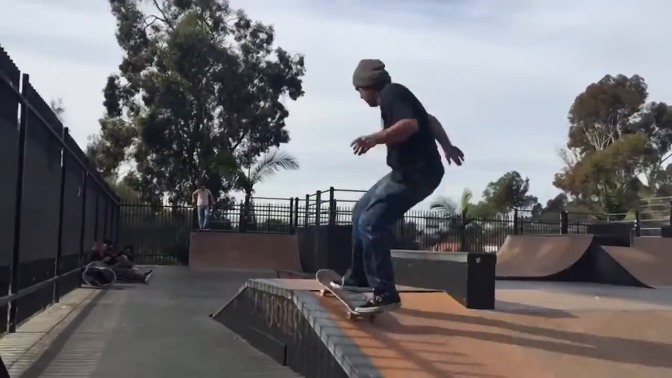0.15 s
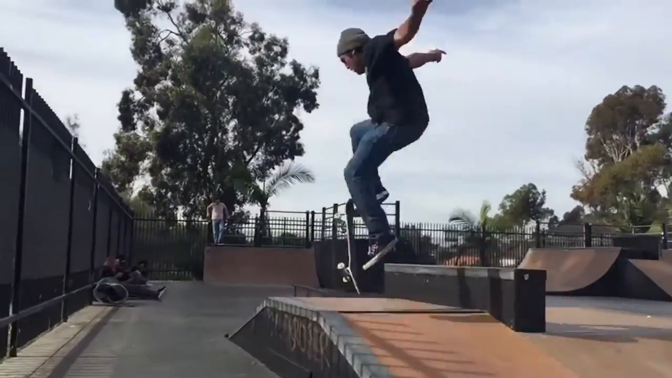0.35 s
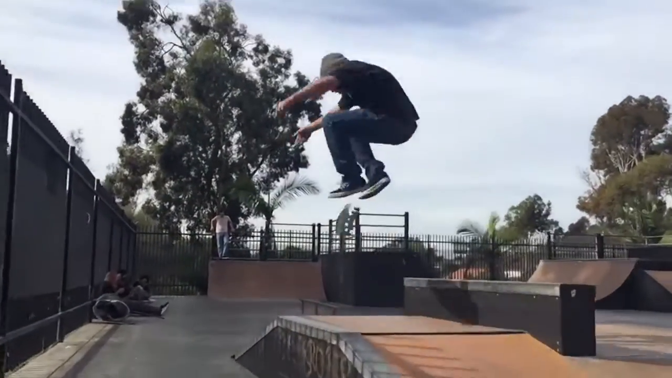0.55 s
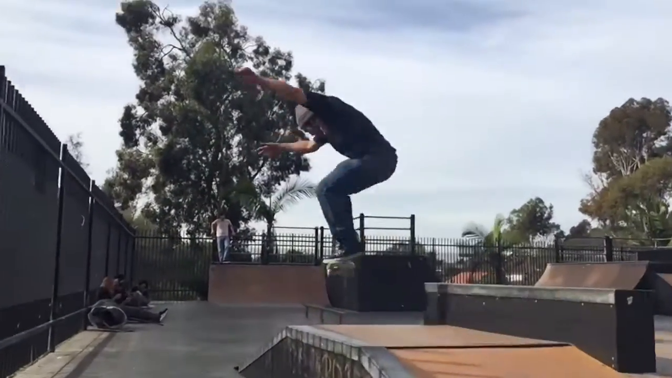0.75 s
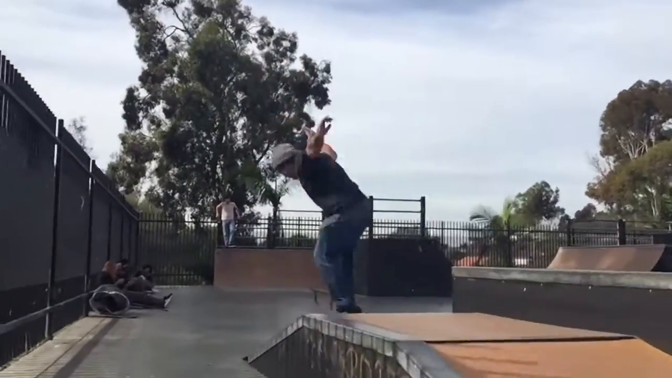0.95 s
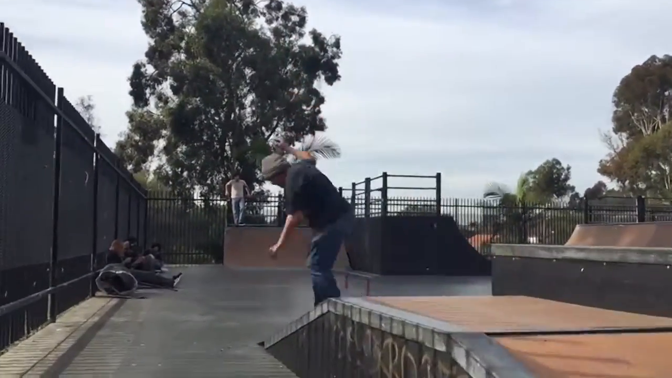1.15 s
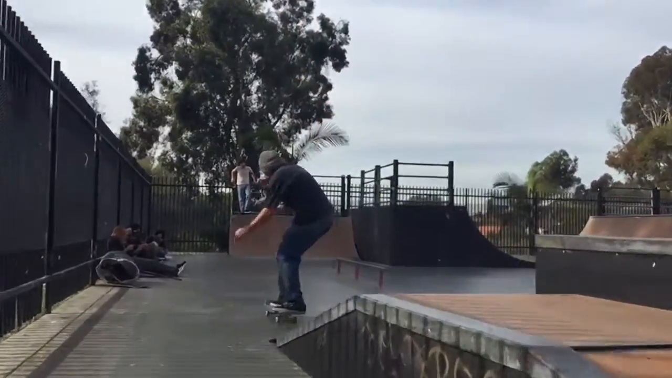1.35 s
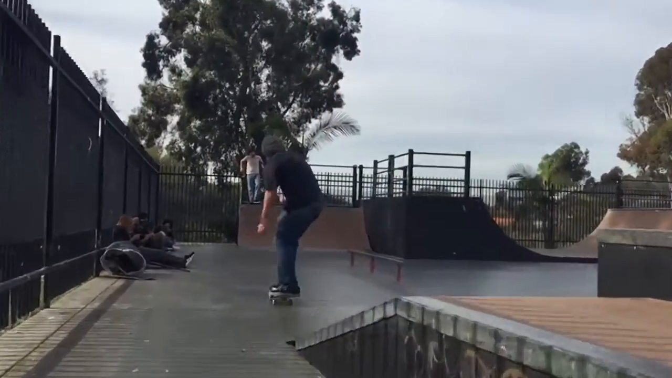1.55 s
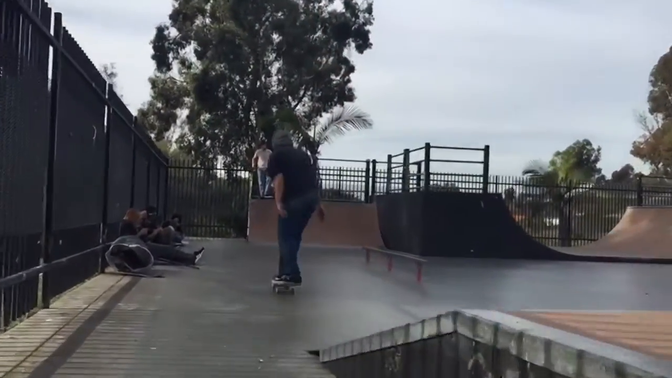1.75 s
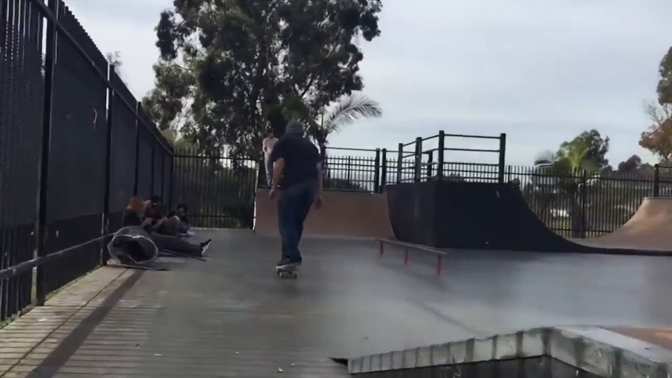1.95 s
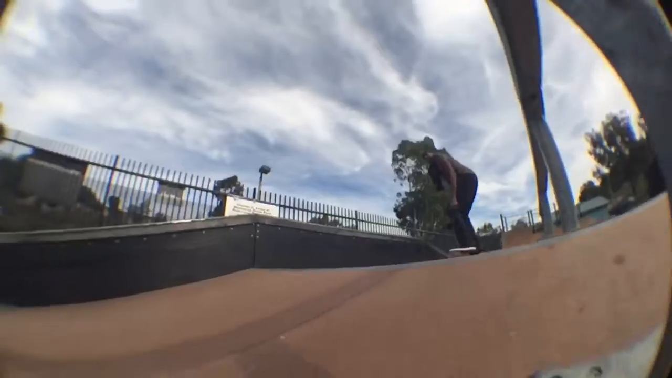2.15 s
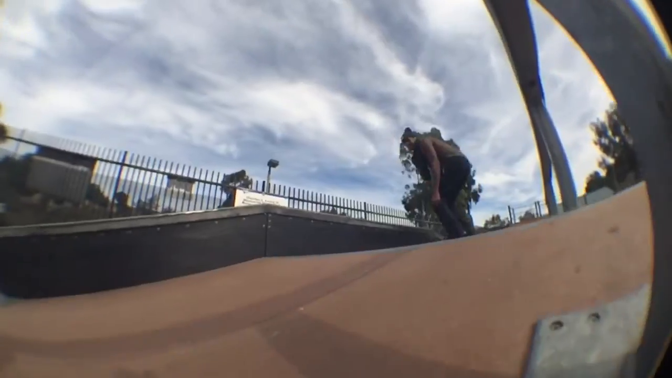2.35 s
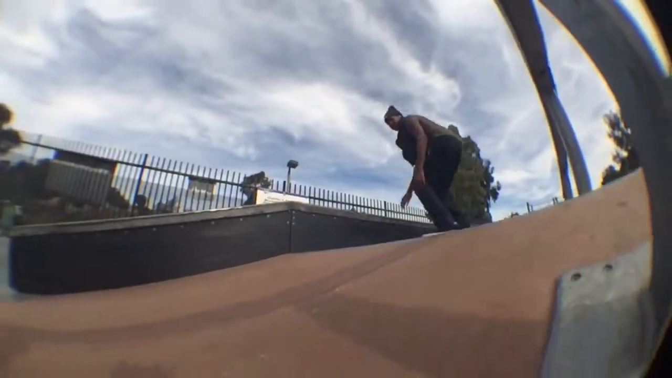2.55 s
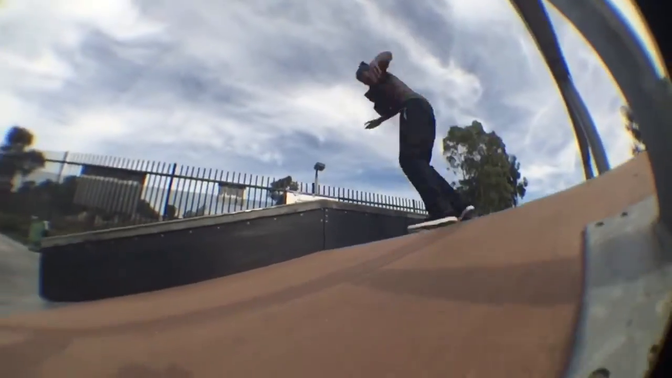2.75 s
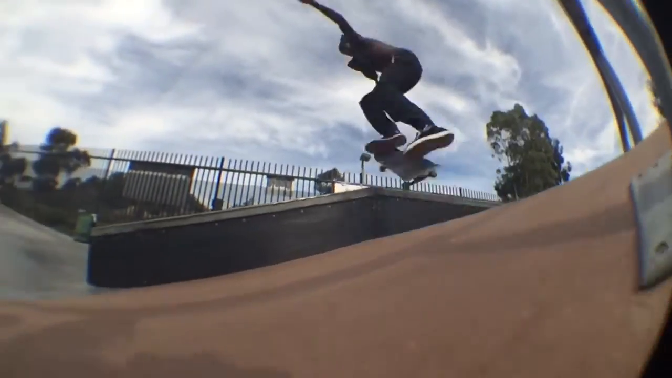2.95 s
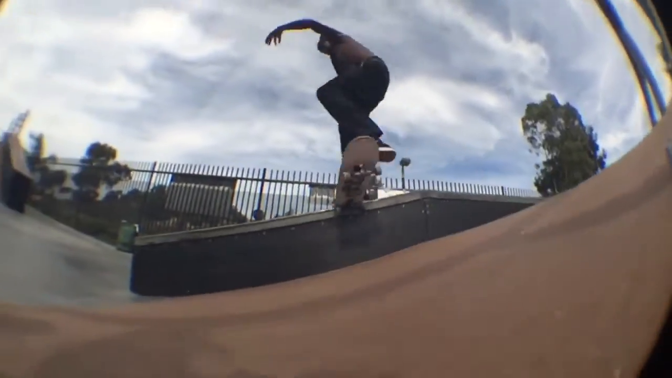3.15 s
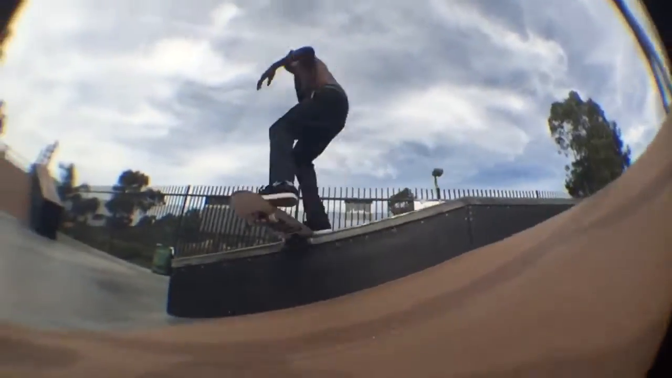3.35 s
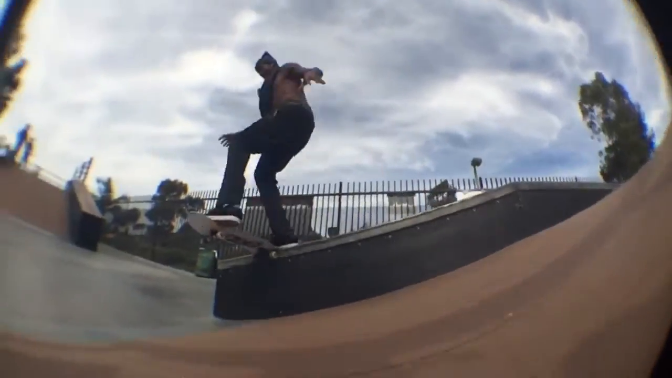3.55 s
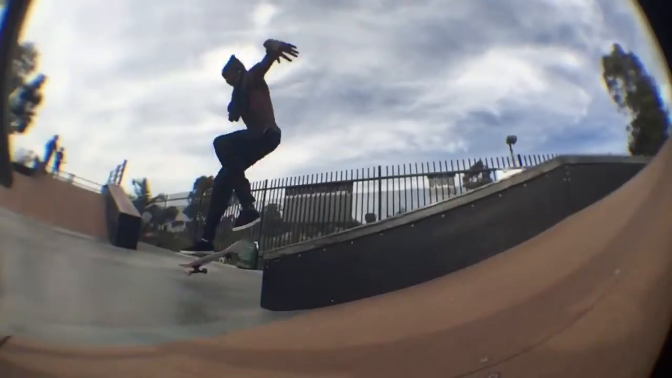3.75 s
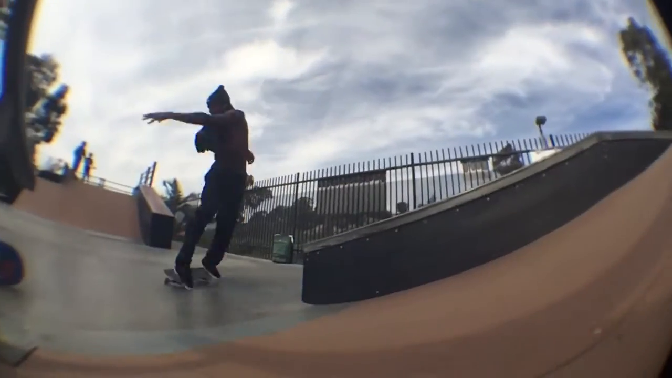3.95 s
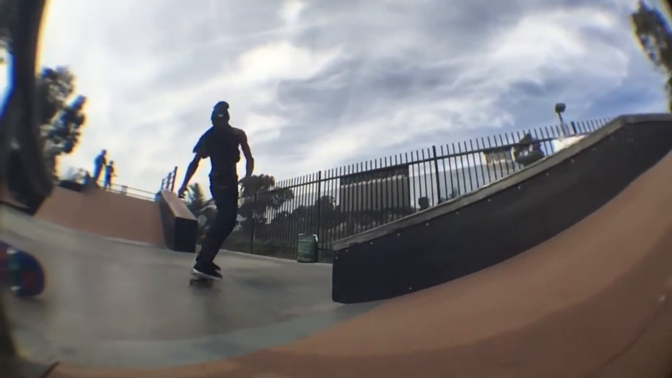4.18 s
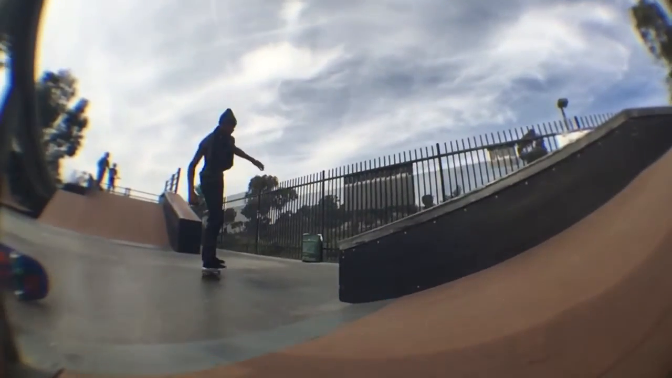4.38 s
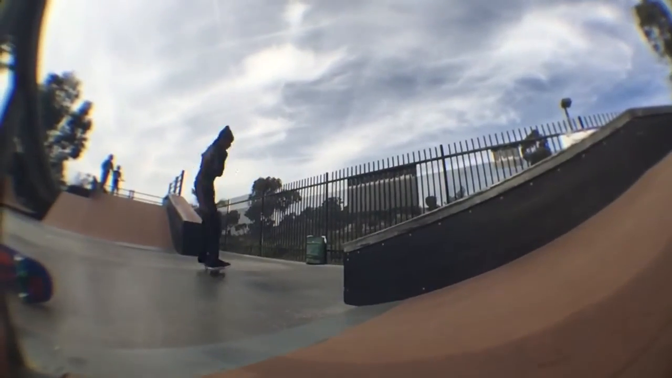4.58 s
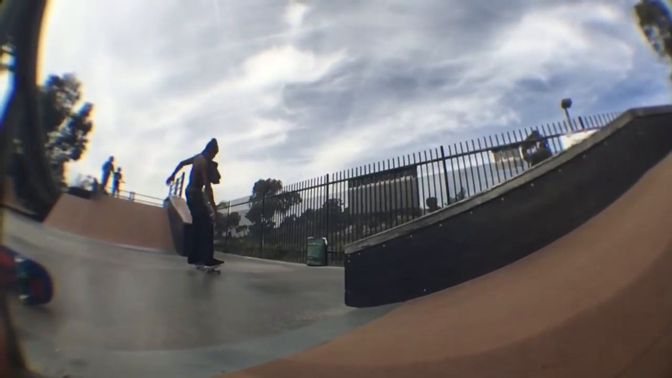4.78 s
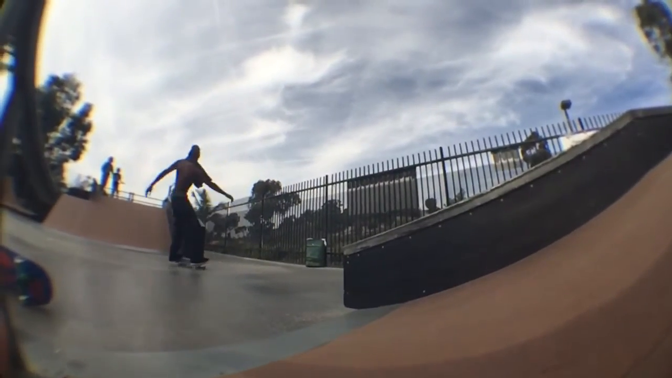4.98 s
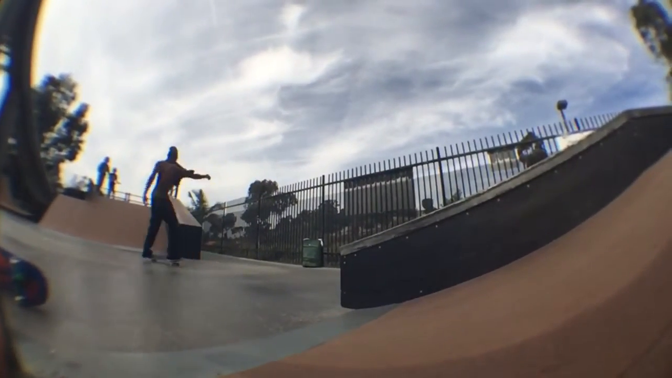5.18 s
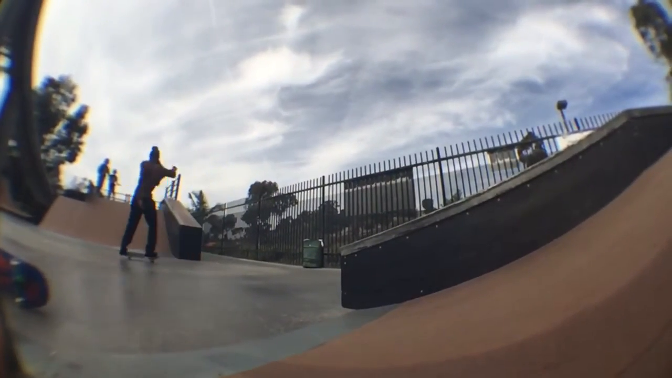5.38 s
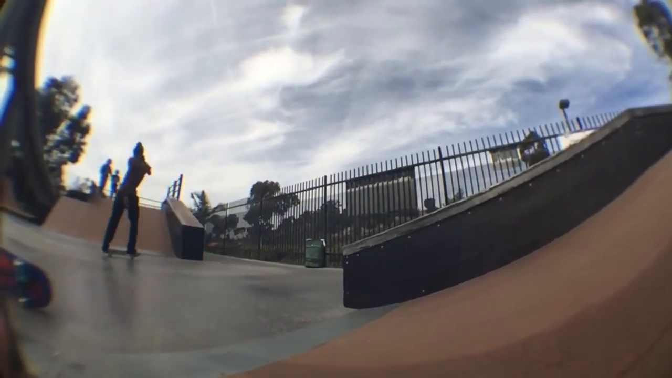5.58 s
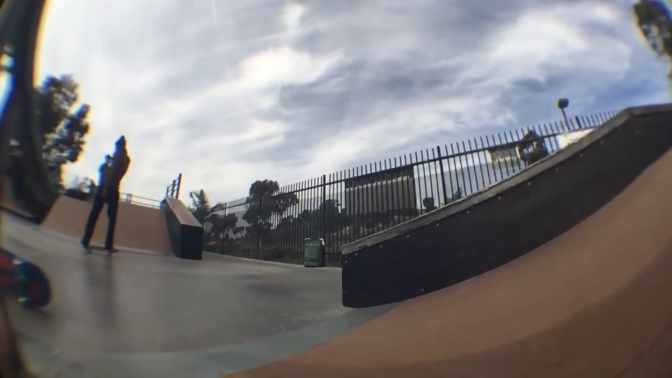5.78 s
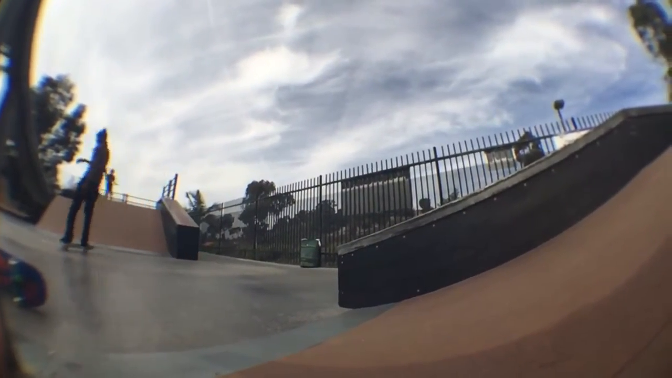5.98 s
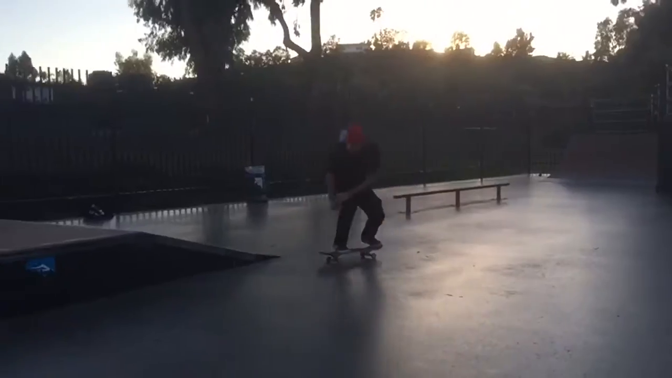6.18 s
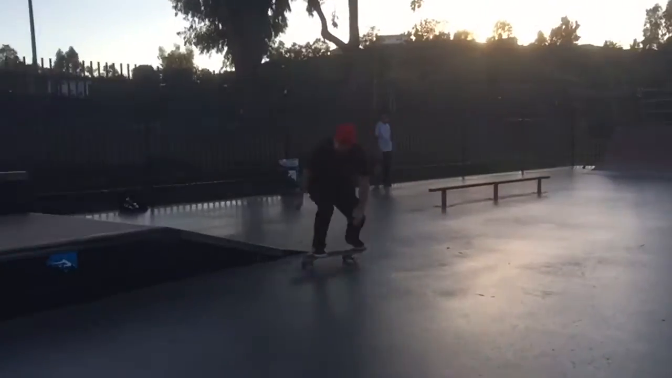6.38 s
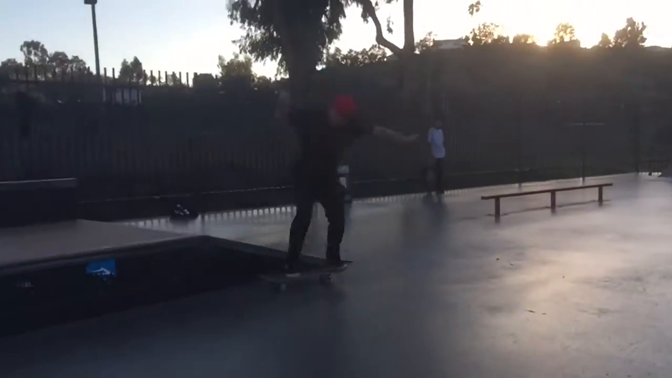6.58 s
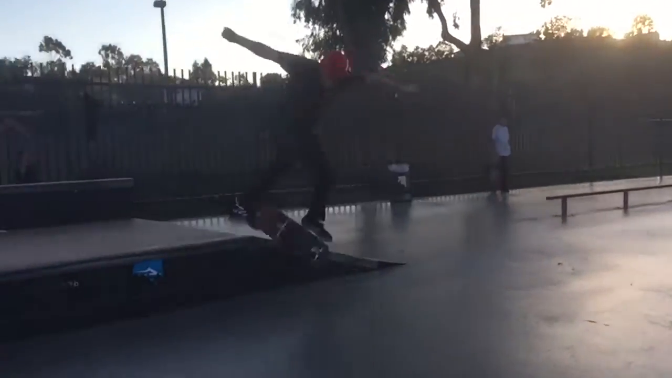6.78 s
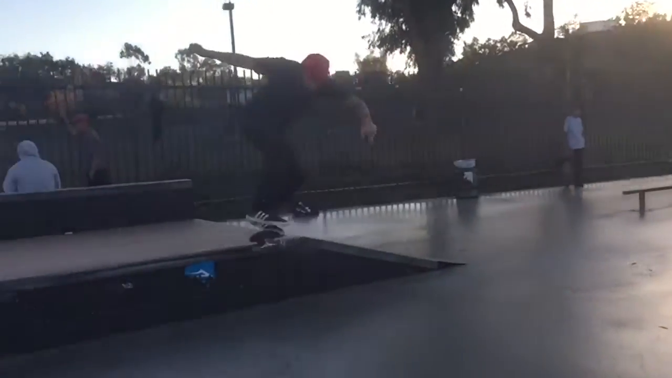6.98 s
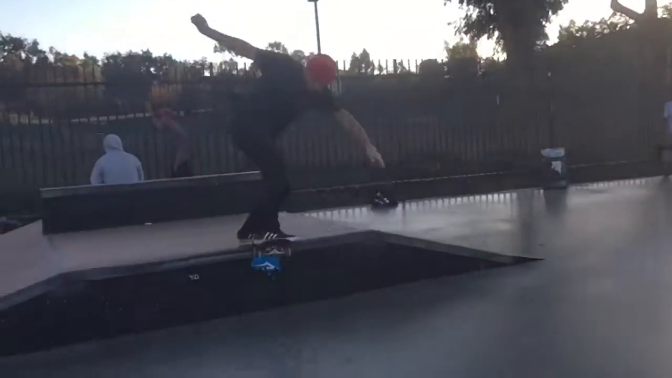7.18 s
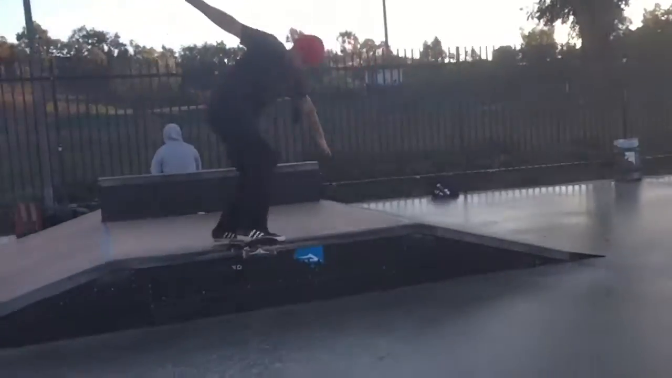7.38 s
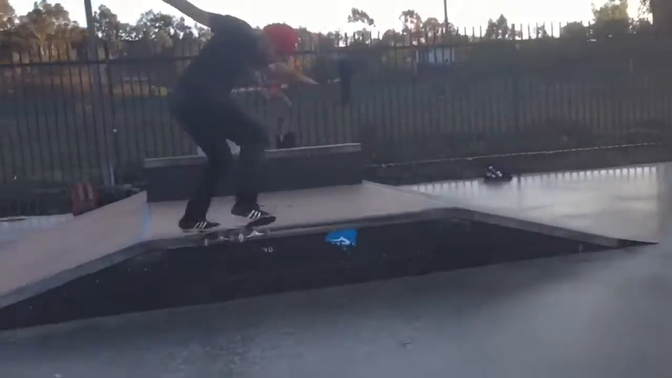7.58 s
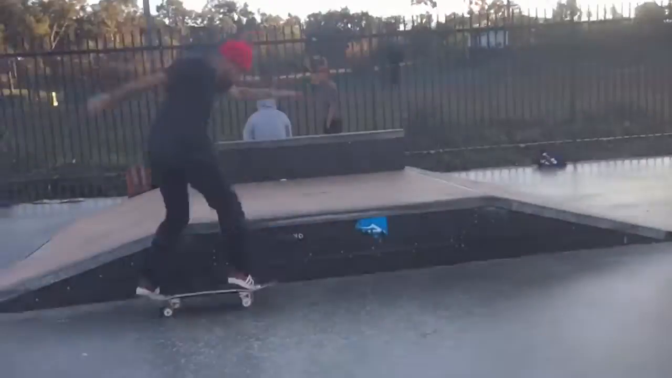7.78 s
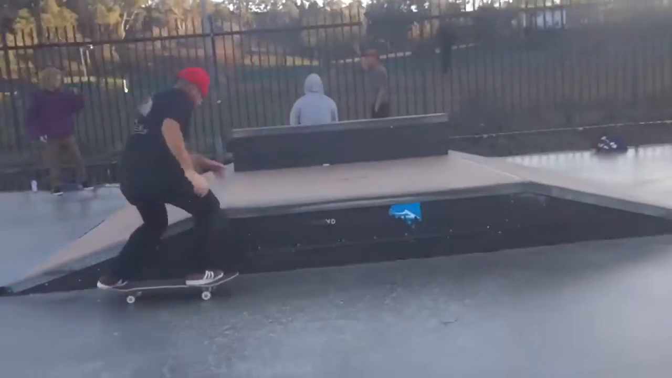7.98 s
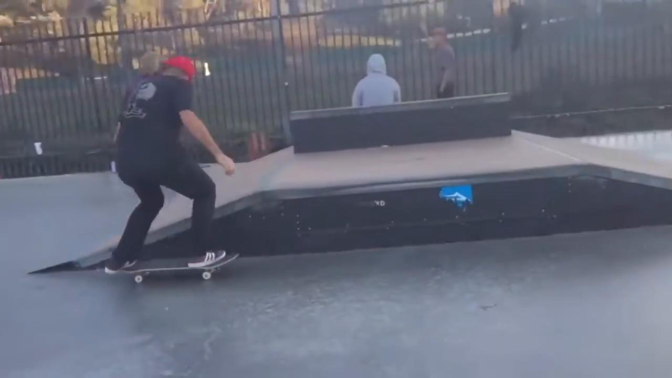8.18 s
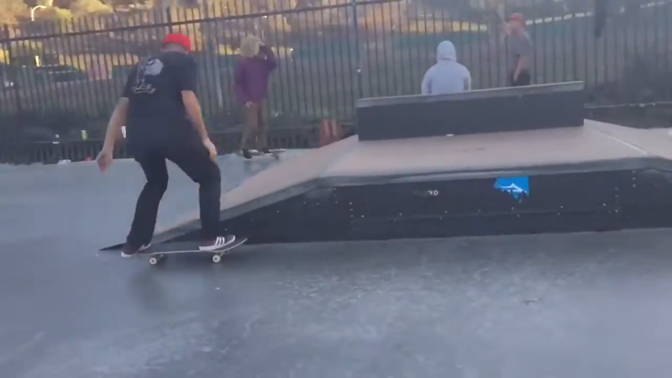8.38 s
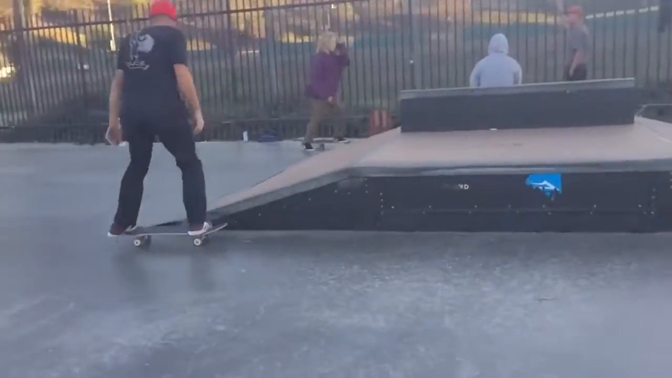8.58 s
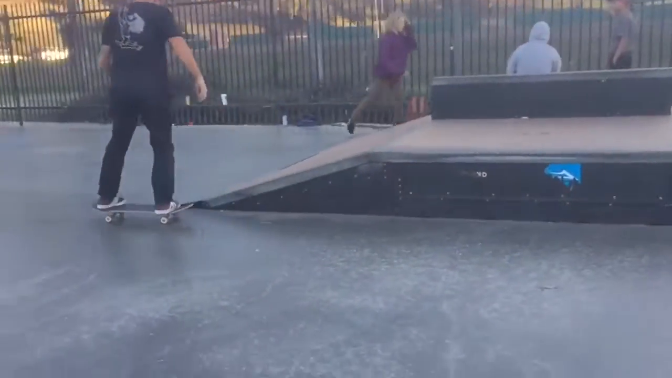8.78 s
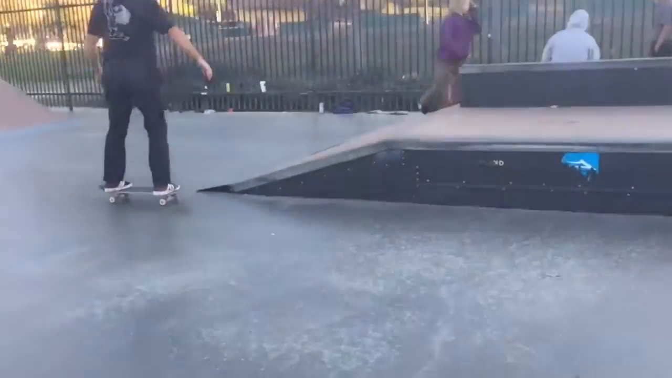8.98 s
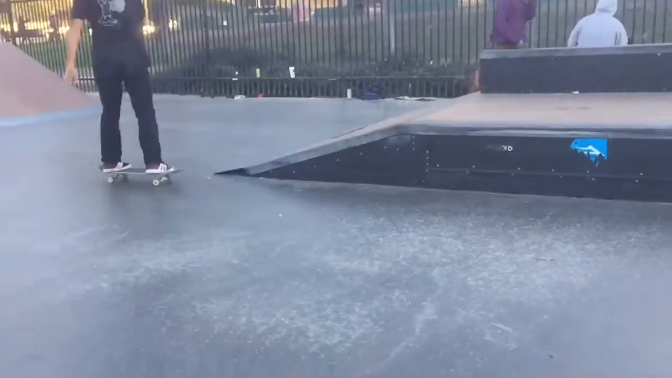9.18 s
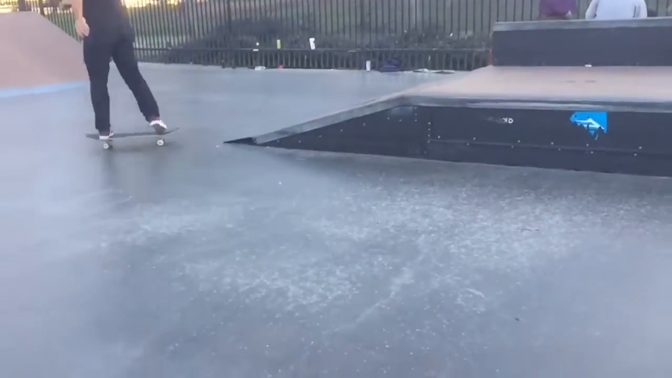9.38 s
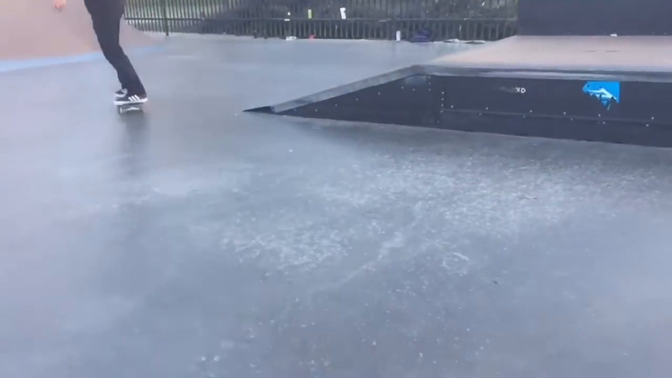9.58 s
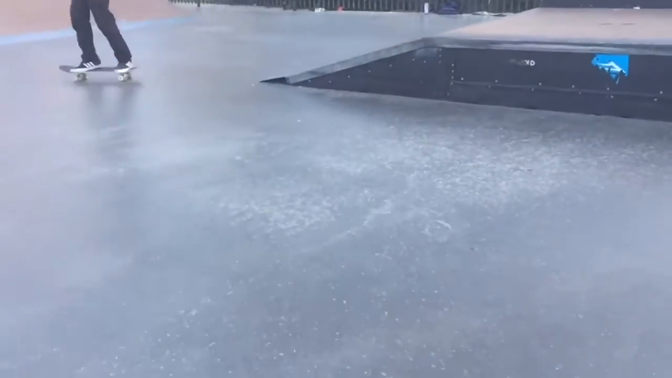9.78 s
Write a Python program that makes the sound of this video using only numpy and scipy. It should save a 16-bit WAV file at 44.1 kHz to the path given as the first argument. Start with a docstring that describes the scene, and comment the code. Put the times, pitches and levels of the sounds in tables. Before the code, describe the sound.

In an open skatepark, a close skateboard rumbles loudly, pops and slams down with scuffs and thuds. A second run rumbles up a bank, cracks hard onto a ledge, grinds briefly and lands sharply, then rolls away faintly. A third, quieter run has a light pop, duller landings and sparse wheel ticks. Thin echoes return from ramps; the close microphone flattens the loudest hits.

```python
"""An outdoor concrete park: three skateboard runs, one after the other, heard from a board that rolls alongside.
Rolling and sliding are filtered noise with grains of grit, shaped by level curves, with narrow resonances humming.
Pops, landings and joints are short broadband blows that ring a deck; heavy ones add low damped swings of the deck.
The blows echo off ramps and walls, and the loudest peaks overload the microphone."""
import sys
import numpy as np
from scipy import signal
from scipy.io import wavfile

SR = 44100
rng = np.random.default_rng(int(sys.argv[2]) if len(sys.argv) > 2 else 0)


def store_pcm(level_fs):
    """Save levels as 16-bit WAV."""
    pcm = np.round(np.clip(level_fs, -1, 1) * 32767).astype(np.int16)
    wavfile.write(sys.argv[1], SR, np.atleast_2d(pcm).T)


N = 433944
TIME = np.arange(N) / SR  # [s]
EDGE_HZ = 15600  # upper limit of the band, and start of the sweep in each blow
RUN_FADE_S = 0.037  # the rolling dips between two runs

# Moments when the second and the third rider take over: (time [s])
RUN_STARTS = [2.05, 6.08]


def gain_of(db):
    """Level definition: decibels to amplitude, 20 dB per factor of ten."""
    return 10 ** (np.asarray(db) / 20)


def evened(x):
    """Power normalisation: scales a signal to rms 1."""
    return x / np.sqrt(np.mean(x ** 2) + 1e-20)


def read(points, hz):
    """Logarithmic frequency scale: interpolates a table along it."""
    f, value = np.transpose(points)
    return np.interp(np.log(hz + 1), np.log(f + 1), value)


def add(mix, s, sound):
    """Superposition: sums a sound into the mix from time s on."""
    part = mix[max(round(s * SR), 0):][:len(sound)]
    part += sound[:len(part)]


def coloured(x, points, size=4096):
    """Minimum-phase filtering: the phase is the Hilbert transform of the log gain, so the filter is causal."""
    hz = abs(np.fft.fftfreq(size, 1 / SR))
    log_gain = np.log(gain_of(np.maximum(read(points, hz), -100)))
    response = np.exp(np.conj(signal.hilbert(log_gain)))
    taps = np.fft.ifft(response).real
    return signal.fftconvolve(x, taps[:size // 2])[:len(x)]


def wander(hz):
    """Low-passed noise: a slow random fluctuation of rms 1, up to the given rate."""
    low_pass = 1 / (1 + (np.fft.fftfreq(N, 1 / SR) / hz) ** 4)
    slow = np.fft.ifft(np.fft.fft(rng.standard_normal(N)) * low_pass).real
    return evened(slow)


def during(start, end, fade_s):
    """Linear gating: gain of 1 from start to end, with soft edges inside."""
    return np.clip(np.minimum(TIME - start, end - TIME) / fade_s, 0, 1)


def curve(points):
    """Level envelope: gain along a curve in decibels that fades in and out at its ends."""
    s, db = np.transpose(points)
    return gain_of(np.interp(TIME, s, db)) * during(s[0], s[-1], RUN_FADE_S)


def swells(events, rise_db_per_s, fall_db_per_s):
    """Exponential growth and decay: a contact builds up to each peak and then lets go."""
    gains = []
    for s, db in events:
        below_peak = np.maximum((s - TIME) * rise_db_per_s, (TIME - s) * fall_db_per_s)
        gains.append(gain_of(db - below_peak))
    return np.max(gains, axis=0)


def rubbing(colour, level, grit_per_s, grit_db, lumpy_db, lumpy_hz):
    """Roughness excitation: fine texture and separate grains shake a board under a wavering contact force."""
    texture = rng.standard_normal(N)
    grit = rng.standard_normal(N) * (rng.random(N) < grit_per_s / SR)
    force = gain_of(lumpy_db * wander(lumpy_hz))
    drive = (texture + gain_of(grit_db) * evened(grit)) * force
    return evened(coloured(drive, colour)) * level


def wheels():
    """Rolling noise: the roughness of concrete under urethane wheels, coloured run by run."""
    # Spectra of the rolling, the second run in two layers: (frequency [Hz], relative level [dB])
    first_colour = [(18, -57), (30, -14), (75, 3.5), (160, -3), (262, -0.5), (466, -2), (943, -12),
                    (1070, -7.5), (1510, -19), (2060, -21), (2290, -15), (2900, -29.5), (7620, -39),
                    (11900, -39), (15400, -45)]
    ramp_colour = [(20, -38), (45, -14), (100, -4), (170, -3.5), (290, -9.5), (390, -11), (520, -15.5),
                   (800, -16), (1100, -22), (2000, -27), (3000, -41), (4500, -49.5), (5300, -59.5),
                   (15000, -75.5)]
    away_colour = [(25, -39), (65, -5), (110, -8.5), (170, -3.5), (270, -8), (400, -6), (720, -4),
                   (950, -3.5), (1800, -5), (2300, -14.5), (3000, -26), (6200, -40.5), (10500, -52.5),
                   (14000, -45.5)]
    last_colour = [(20, -2), (35, 2.5), (66, -2), (105, -17), (170, -7.5), (400, -6), (600, 0), (750, -1),
                   (930, -14), (1250, -15), (2000, -31), (4200, -49), (6500, -53.5), (15000, -55.5)]
    # Loudness of the second run's two layers: (time [s], level [dB])
    ramp_level = [(2.045, -28.5), (2.31, -30), (2.38, -26), (2.85, -26.5), (3.05, -40), (3.5, -42),
                  (3.85, -34), (4.08, -53)]
    away_level = [(2.91, -27), (3.1, -38.5), (4.05, -39.5), (4.15, -48), (4.28, -38), (4.75, -38.5),
                  (5.0, -35), (5.4, -36.5), (5.6, -41.5), (6.08, -42.5)]
    # the first and the last run roll at a steady level
    first_db, last_db = -26, -38
    first_gain = gain_of(first_db) * during(-np.inf, RUN_STARTS[0], RUN_FADE_S)
    last_gain = gain_of(last_db) * during(RUN_STARTS[1], np.inf, RUN_FADE_S)
    first = rubbing(first_colour, first_gain, grit_per_s=490, grit_db=-9.5, lumpy_db=0.54, lumpy_hz=25)
    ramp = rubbing(ramp_colour, curve(ramp_level), grit_per_s=590, grit_db=-7.5, lumpy_db=0.1, lumpy_hz=25)
    away = rubbing(away_colour, curve(away_level), grit_per_s=610, grit_db=-8.5, lumpy_db=1.93, lumpy_hz=22)
    last = rubbing(last_colour, last_gain, grit_per_s=400, grit_db=-14.5, lumpy_db=1.76, lumpy_hz=28)
    return first + ramp + away + last


def slides():
    """Sliding friction: wheels scuff, hiss and skid on the banks; a metal truck grinds over the ledge."""
    # Spectra of the four contacts: (frequency [Hz], relative level [dB])
    scuff_colour = [(300, -27.5), (1300, -15.5), (2300, -2.5), (3100, -2), (4000, -3.5), (5000, -14.5),
                    (7000, -21.5), (9500, -23), (15000, -42.5)]
    hiss_colour = [(400, -26.5), (1200, -4), (2400, 1), (3400, -5.5), (4400, -17.5), (5500, -32.5),
                   (9000, -47.5), (15000, -46.5)]
    skid_colour = [(700, -17), (1500, -8), (2600, 2.5), (3300, 3.5), (4300, 0.5), (5100, -14), (6100, -8),
                   (7300, -23), (13000, -25), (15500, -26)]
    grind_colour = [(100, -10.5), (500, -9), (800, -1), (1080, -2), (1600, -13.5), (2200, -14), (3200, -30),
                    (4500, -44), (5600, -40.5), (8000, -56), (15000, -60)]
    # Wheels scuffing sideways at take-offs and landings: (time [s], peak level [dB])
    scuff_peaks = [(0, -11.5), (.056, -13), (.4, -34.5), (1.255, -28.5)]
    # Wheels hissing over a bank: (time [s], peak level [dB])
    hiss_peaks = [(2.75, -32), (3.88, -44), (6.88, -59)]
    # Short skids: (time [s], peak level [dB])
    skid_peaks = [(3.14, -50), (3.46, -50), (3.615, -47), (4.29, -57.5)]
    # The truck biting into the ledge: (time [s], peak level [dB])
    bite_peaks = [(3.225, -19), (3.315, -17.5), (3.405, -19)]
    scuff_gain = swells(scuff_peaks, rise_db_per_s=346.5, fall_db_per_s=174)
    hiss_gain = swells(hiss_peaks, rise_db_per_s=58.5, fall_db_per_s=37)
    skid_gain = swells(skid_peaks, rise_db_per_s=119, fall_db_per_s=113)
    grind_gain = swells(bite_peaks, rise_db_per_s=279.5, fall_db_per_s=224.5)
    # the truck leaves the ledge
    grind_gain = grind_gain * during(-np.inf, 3.445, fade_s=0.022)
    scuff = rubbing(scuff_colour, scuff_gain, grit_per_s=700, grit_db=-6, lumpy_db=0.9, lumpy_hz=90)
    hiss = rubbing(hiss_colour, hiss_gain, grit_per_s=730, grit_db=-2.5, lumpy_db=1.9, lumpy_hz=45)
    skid = rubbing(skid_colour, skid_gain, grit_per_s=149.6, grit_db=-10, lumpy_db=2.0, lumpy_hz=184)
    grind = rubbing(grind_colour, grind_gain, grit_per_s=430, grit_db=-2, lumpy_db=2.5, lumpy_hz=70)
    return scuff + hiss + skid + grind


def drones():
    """Resonance under random excitation: rough ground keeps narrow bands humming as their pitch glides down."""
    # Narrow resonances of the rolling boards:
    # (start [s], end [s], starting frequency [Hz], bandwidth [Hz], level [dB])
    resonances = [(0, 1.1, 84, 35, -63), (0, 1.6, 2300, 400, -70), (0, 1.8, 1223, 120, -60),
                  (2.331, 2.75, 133.4, 14, -33), (3.52, 3.9, 107.8, 46, -34.5),
                  (4.36, 4.62, 1750, 350, -42.5), (4.65, 5.7, 743, 160, -47), (4.9, 6.04, 176.3, 54, -47.5),
                  (6.1, 10, 672.5, 147, -51), (6.1, 9.2, 67, 16.7, -54), (7.3, 7.52, 318.7, 26, -44)]
    pitch_loss = .04  # share of its frequency that a resonance loses as the board slows
    out = np.zeros(N)
    for start, end, hz, width, db in resonances:
        n = int((end - start) * SR)
        shake = rng.standard_normal(n) + 1j * rng.standard_normal(n)
        # slow complex noise on a gliding carrier makes a narrow band
        sway = signal.sosfilt(signal.butter(2, width / 2, fs=SR, output="sos"), shake)
        glide = np.linspace(hz, hz * (1 - pitch_loss), n)
        carrier = np.exp(2j * np.pi * np.cumsum(glide) / SR)
        hum = evened((sway * carrier).real)
        add(out, start, gain_of(db) * hum * signal.windows.tukey(n, .04))
    return out


def clack(deck, db, hz, t60, body_db, edge_db, ring_db=-2, knock_db=-6, knock_t60=0.042, blow=2.8,
          spread_s=.0035, rise_s=.0018, clatter_per_s=400, clatter=5.3, deep_db=-5, shoulder_db=-4, top_db=-14):
    """Impact excitation of modes: a blow and a dying chatter of small contacts ring the deck."""
    t = np.arange(SR // 4) / SR
    rise = 1 - np.exp(-t / rise_s)
    # loose trucks and skipping wheels add separate taps to the chatter
    taps = rng.random(len(t)) < clatter_per_s / SR
    chatter = rng.standard_normal(len(t)) * (1 + clatter * taps)
    chatter = chatter * gain_of(-60 * t / t60) * rise
    # bending waves spread the blow: the treble arrives first, the bass a few ms later
    count = int(spread_s * SR)
    sweep = signal.chirp(t[:count], EDGE_HZ, spread_s, 0, phi=90)
    chatter[:count] += blow * sweep / np.linalg.norm(sweep)
    # where the deck is struck sets the colour around the pitch of the clack
    colour = [(hz / 16, body_db + 2 * deep_db), (hz / 4, body_db + deep_db / 2),
              (hz / 2, body_db), (hz, 0), (hz * np.sqrt(2), shoulder_db), (hz * 4, edge_db),
              (hz * 8, edge_db + top_db), (hz * 24, edge_db + 1.6 * top_db)]
    crack = coloured(chatter, colour)
    modes = sum(gain_of(level - 60 * t / ring) * np.cos(2 * np.pi * f * t) for f, level, ring in deck)
    ringing = signal.fftconvolve(crack, modes)[:len(t)]
    # the resonance struck most squarely gives the clack its pitch
    knock = rise * gain_of(-60 * t / knock_t60) * np.sin(2 * np.pi * hz * t)
    sound = evened(crack) + gain_of(ring_db) * evened(ringing) + gain_of(knock_db) * evened(knock)
    # the level is the whole energy spread over 10 ms
    return gain_of(db) * sound / np.sqrt(np.sum(sound ** 2) / (SR / 100))


def thump(db, hz, t60, rise_s=0.0047):
    """Damped oscillation: one low, decaying swing of the loaded deck."""
    t = np.arange(SR // 2) / SR
    envelope = gain_of(db - 60 * t / t60) * (1 - np.exp(-t / rise_s))
    return envelope * np.sin(2 * np.pi * hz * t)


def deck_at(s):
    """Modal description: the resonances of the deck with its trucks that is ridden at time s."""
    # Modes of each rider's deck: (frequency [Hz], level [dB], t60 [s])
    first_deck = [(313, 2.5, 0.06), (600, -3, 0.017), (720, -8.5, 0.074), (1006, 0, 0.016),
                  (1154, -7.5, 0.032), (1520, -12, 0.062), (2044, -3.5, 0.033), (2340, 6, 0.015),
                  (2490, -4.5, 0.022), (3250, -0.5, 0.025), (3810, 3.5, 0.027), (4600, -14.5, 0.024),
                  (5720, -14, .03)]
    second_deck = [(386, -4.5, 0.051), (548.4, -8, 0.023), (905, -5, 0.038), (1082, 4.5, 0.01),
                   (1400, 2.5, 0.01), (1595, 5.5, 0.014), (1910, -2.5, .04), (2100, -1.5, 0.045),
                   (2328, 4, 0.034), (3160, -4, 0.047), (3720, -2.5, .04), (3965, -4, 0.036),
                   (5745, -2, .03)]
    third_deck = [(311, -1, 0.068), (634, 5, 0.039), (710, -1, 0.033), (730, -4, 0.063), (1016, 0, 0.023),
                  (1216, 5.5, 0.039), (2050, 15.5, 0.01), (2190, 8, 0.021), (2440, 1, .03),
                  (3786, 1, 0.031), (4542, 1.5, 0.036), (5140, -17, .03)]
    return [first_deck, second_deck, third_deck][np.searchsorted(RUN_STARTS, s)]


def boards():
    """Impact and rebound: blows clack and bounce once; a heavy one also flexes the deck; joints only tick."""
    # Tail pops, catches and knocks of the bare board: (time [s], level [dB], clack pitch [Hz], chatter t60 [s],
    # body an octave below the pitch [dB], edge two octaves above it [dB])
    light_blows = [(0.381, -13.5, 2270, 0.024, -11, -22.5), (.729, -16.5, 1553, 0.033, -2, -24),
                   (1.240, -20.5, 3030, 0.1, 3, -16), (3.132, -23.5, 1250, 0.18, -4, -27),
                   (3.176, 1, 1397, 0.012, -1, -24.5), (3.208, -8.5, 1320, 0.051, 1.5, -40.5),
                   (3.301, -16.5, 1000, 0.074, -9.5, -56), (3.318, -13, 1055, 0.068, -16, -56),
                   (3.668, -9.5, 790, 0.027, -12.5, -31.5), (3.685, -12, 805, 0.12, -11, -26),
                   (3.939, -1, 1866, 0.032, 5, -20.5), (3.976, -4.5, 1500, 0.085, 9.5, -23.5),
                   (4.221, -26.5, 1700, 0.04, 5, -29.5), (6.756, -23, 1915, 0.033, 11.5, -20.5),
                   (7.221, -31, 1498, 0.048, 3.5, -18.5), (7.241, -29.5, 1330, 0.31, 1, -23),
                   (7.912, -32, 890, 0.17, -1, -28)]
    # Landings, and a pop with the rider's full weight behind it: the same six columns, then
    # (flex level [dB], flex frequency [Hz], flex t60 [s], sag level [dB])
    heavy_blows = [(0.035, -18, 2560, .026, 18, -2, -9.5, 193, 0.085, -36),
                   (.955, -3, 2084, .11, 8, -21, -5.5, 157, 0.15, -1.5),
                   (1.026, -17, 1840, 0.25, 1, -19, 3.5, 186.6, 0.093, 9),
                   (1.178, -17, 2990, 0.11, -4, -18, -15.5, 137, 0.13, -23),
                   (1.286, -22.5, 597, 0.059, -1, -36, -27, 168, 0.19, -12),
                   (2.146, -19, 1880, 0.1, 10, -35, 2.5, 185, 0.07, -7),
                   (2.327, -22.5, 1420, 0.11, 8, -36.5, -1.5, 174.6, 0.065, -9),
                   (2.905, -10.5, 2000, 0.05, -2.5, -41, -10, 127, 0.091, -18),
                   (3.187, 1, 1863, 0.043, 4, -20.5, -1, 128.3, .19, -8),
                   (3.757, -18.5, 1045, 0.033, -0.5, -29.5, -19, 88, 0.19, -35),
                   (3.997, -3.5, 1544, 0.036, 7.5, -25.5, 0.5, 348, 0.053, -1.5),
                   (7.060, -12, 2130, 0.05, 14.5, -30, -27, 253, 0.23, -25.5),
                   (7.095, -23, 949, 0.3, 13.5, -18, -29.5, 147.5, 0.4, -28.5),
                   (7.842, -8.5, 550, 0.093, -8.5, -29, -2.5, 262, 0.057, -13.5)]
    # Wheels ticking over joints and cracks: (time [s], level [dB], pitch [Hz])
    joints = [(3.116, -25.5, 788), (3.496, -30.5, 2050), (3.827, -28, 1110), (3.895, -25, 970),
              (4.393, -33, 1620), (4.67, -31, 1420), (6.025, -38.5, 1440), (7.761, -47.5, 1990),
              (7.786, -46.5, 1880), (8.730, -38, 1046), (8.895, -34, 1110), (9.019, -41.5, 1075),
              (9.287, -42.5, 1080), (9.778, -38, 1410)]
    rebound_s, rebound_db, rebound_pitch = 0.023, -16, .9  # one bounce, softer and duller
    flex_delay_s = .003  # the loaded deck starts to swing just after the blow
    sag_delay_s, sag_pitch = .015, .51  # then it sags on its trucks, about an octave lower
    out = np.zeros(N)
    for s, db, hz, t60, body_db, edge_db, *_ in light_blows + heavy_blows:
        deck = deck_at(s)
        add(out, s, clack(deck, db, hz, t60, body_db, edge_db))
        rebound = clack(deck, db + rebound_db, hz * rebound_pitch, t60, body_db, edge_db)
        add(out, s + rebound_s, rebound)
    for s, *_, flex_db, flex_hz, flex_t60, sag_db in heavy_blows:
        add(out, s + flex_delay_s, thump(flex_db, flex_hz, flex_t60))
        add(out, s + sag_delay_s, thump(sag_db, flex_hz * sag_pitch, flex_t60, rise_s=0.0051))
    for s, db, hz in joints:
        add(out, s, clack(deck_at(s), db, hz, t60=.038, body_db=0.5, edge_db=-35.5, knock_db=-0.5))
    return out


def park(x, first_s=0.0033, size=256):
    """Reverberation: thin, scattered echoes from ramps and walls, each band dying at its own speed."""
    # Decay of the echo: (frequency [Hz], t60 [s])
    decay = [(100, 0.46), (500, 0.29), (2000, 0.42), (5000, 0.11), (14000, .2)]
    # Spectrum of the echo: (frequency [Hz], level [dB])
    echo_colour = [(100, -2.5), (400, -7), (1200, -4), (3000, -5.5), (6000, -1), (14000, -11.5)]
    # 2000 reflections per second on average, none before the first path
    taps = rng.standard_normal(SR) * (rng.random(SR) < 2000 / SR) * (np.arange(SR) > first_s * SR)
    hz, t, bands = signal.stft(taps, SR, nperseg=size)
    dying = gain_of(-60 * t / read(decay, hz)[:, None])
    tail = signal.istft(bands * dying, SR, nperseg=size)[1]
    return signal.fftconvolve(coloured(x, echo_colour), tail / np.linalg.norm(tail))[:N]


def scene(echo_db=-18):
    """Superposition: blows with their echoes over the rolling, sliding and humming."""
    blows = boards()
    echoes = gain_of(echo_db) * park(blows)
    return (blows + echoes + wheels() + slides() + drones())[None]


def record(dry, low_cut_hz=42):
    """Saturation: the microphone loses the deepest bass and flattens the loudest peaks; then the band limit."""
    high_pass = signal.butter(2, low_cut_hz, "high", fs=SR, output="sos")
    thinned = signal.sosfilt(high_pass, dry)
    flattened = thinned / (1 + thinned ** 8) ** (1 / 8)
    band_limit = signal.firwin(511, EDGE_HZ, window=("kaiser", 9), fs=SR)
    return signal.oaconvolve(flattened, band_limit[None], "same")


dry = scene()
out = record(dry)
store_pcm(out)
```